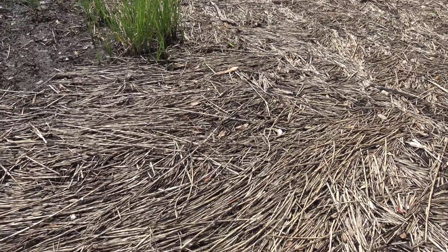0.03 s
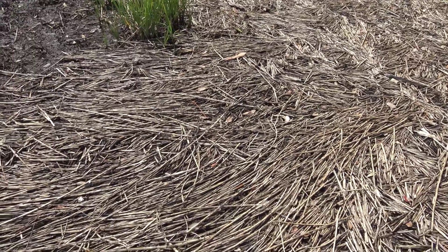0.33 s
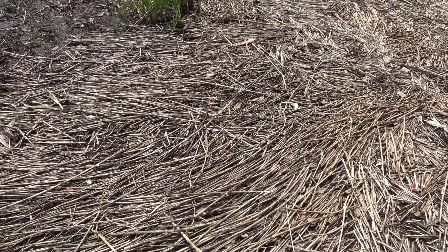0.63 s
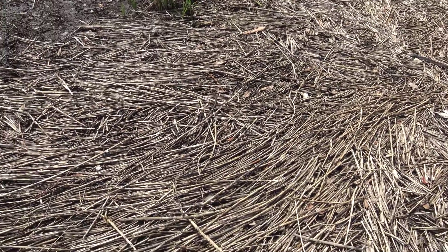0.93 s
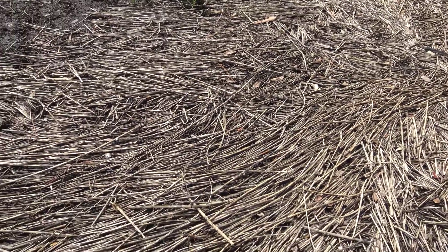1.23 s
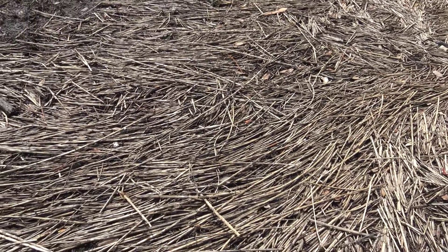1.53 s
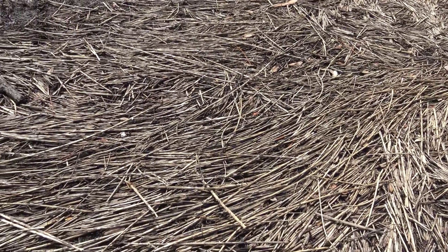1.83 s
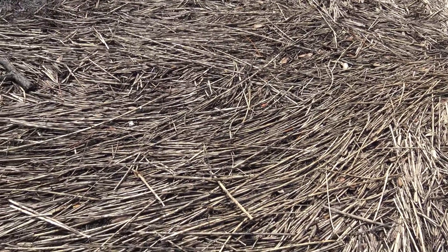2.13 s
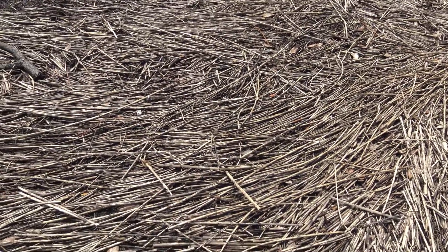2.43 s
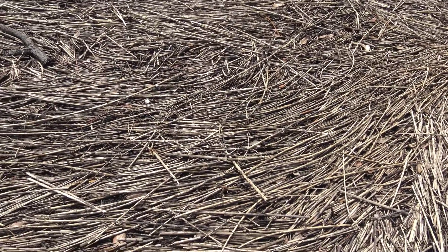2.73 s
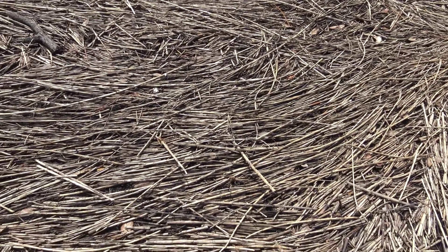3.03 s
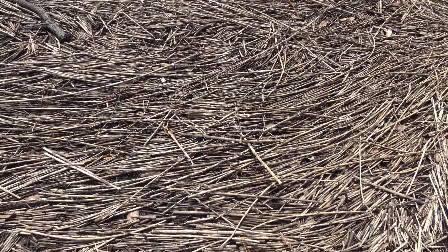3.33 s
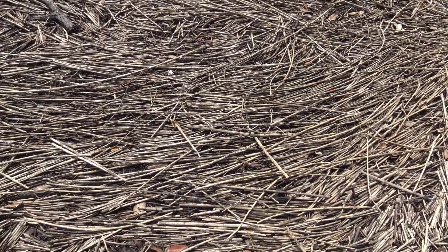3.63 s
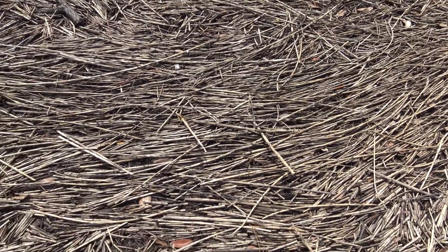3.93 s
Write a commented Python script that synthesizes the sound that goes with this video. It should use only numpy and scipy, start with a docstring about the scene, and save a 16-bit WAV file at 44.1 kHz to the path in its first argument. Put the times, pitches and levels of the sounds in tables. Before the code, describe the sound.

A dense, high ticking rustle of tiny creatures on dry reeds starts faint and swells from about 0.7 seconds, loudest near 3.9. A small bird gives five thin falling chirps, at 0.2, 1.5, 2.6, 3.3 and 3.5 seconds. Stalks tap softly around 0.1, 2.8 and 3.2 seconds, and one snaps at 3.7. Faint outdoor rumble and distant hiss lie underneath throughout.

```python
"""A river bank, the microphone closing in on a mat of dry reeds. From the start, faint rumble and far hiss
lie under the dense ticking of countless small creatures, whose feet set the hollow stalks ringing.
A stalk taps, then a small bird gives the first of five thin falling chirps. From about 0.7 s the
ticking swells as the microphone comes closer, with a few more taps and chirps along the way.
At 3.7 s, just before the ticking is loudest, one stalk snaps."""
import sys
import numpy as np
from scipy import signal
from scipy.fft import rfft, irfft
from scipy.io import wavfile

SR = 44100
rng = np.random.default_rng(int(sys.argv[2]) if len(sys.argv) > 2 else 0)


def file_out(sig):
    """Save sig as 16-bit WAV at sys.argv[1]."""
    # one column per channel
    cols = np.atleast_2d(sig).T
    # limit, then scale
    lim = np.clip(cols, -1, 1)
    pcm = np.round(lim * 32767).astype(np.int16)
    wavfile.write(sys.argv[1], SR, pcm)


N = 176400  # 4 s


def from_db(db):
    """Decibels to gain."""
    return 10 ** (np.asarray(db) / 20)


def unit_rms(x):
    """Scale to rms 1."""
    return x / np.sqrt(np.mean(x ** 2) + 1e-20)


def decay(t, t60):
    """An envelope that falls 60 dB in t60 seconds."""
    return np.exp(-np.log(1000) * t / t60)


def drift(rate_hz):
    """A slow random wander with rms 1."""
    step, settle = 40, 2000
    pole = np.exp(-2 * np.pi * step * rate_hz / SR)
    noise = rng.standard_normal(N // step + settle + 2)
    slow = signal.lfilter([1], [1, -2 * pole, pole * pole], noise)[settle:]
    return np.interp(np.arange(N) / step, np.arange(len(slow)), unit_rms(slow))


def stereo(mid, side, likeness, pan_db):
    """Mix two unrelated signals to left and right; positive pan leans left."""
    likeness = np.clip(likeness, 0, .999)
    mid, side = np.sqrt((1 + likeness) / 2) * mid, np.sqrt((1 - likeness) / 2) * side
    return np.array([(mid + side) * from_db(pan_db / 2), (mid - side) * from_db(-pan_db / 2)])


def footfalls(per_s=4800, spread_db=2):
    """Tiny feet strike at random, most weakly and a few strongly."""
    sizes = from_db(spread_db * np.minimum(rng.exponential(1, N), 4)) * rng.choice([-1, 1], N)
    return sizes * (rng.random(N) < per_s / SR) + 1e-18


# The microphone's approach to the reeds: (time [s], low-ring nearness [dB], high-ring nearness [dB])
APPROACH = [(0, -58, -58), (.68, -56.5, -55), (.99, -49, -49.5), (1.3, -47.5, -48), (1.78, -44, -45),
            (1.96, -43, -41.5), (2.12, -42, -41), (2.3, -39.5, -39.5), (2.8, -38.5, -38.5),
            (3.15, -36.5, -36.5), (3.45, -36, -36), (3.85, -32, -34.5), (4, -34.5, -34.6)]
# Hollow stalks, a little right of the microphone: (frequency [Hz], width [Hz], relative level midway [dB],
# growth [dB per dB of nearness], pan [dB], left-right likeness [0-1])
STALK_RINGS = [(4284, 620, -10.5, 0.48, -3.5, .995), (4810, 550, -4, 0.83, -3, 1),
               (5290, 496, -4, 1.09, -2.5, 0.98), (6070, 1140, -14, .85, -2.5, 1),
               (8940, 1260, -6.5, 0.78, -2.0, 0.93), (9570, 1070, -4, 0.95, -2.4, 0.93),
               (10250, 750, -4.5, 1.25, -2.9, 0.86), (11500, 1800, -13, 0.94, -2.2, .82),
               (14000, 2500, -15, 0.9, -2.3, .78)]

def scurrying(midway_db=-40, split_hz=7500):
    """Footfalls ring the stalks; each ring swells at its own rate as the microphone nears."""
    t, out = np.arange(N) / SR, np.zeros((2, N))
    times, low_db, high_db = np.transpose(APPROACH)
    flurry_db = .19 * drift(rate_hz=6)  # shared by all rings
    for hz, width, db, growth, pan_db, likeness in STALK_RINGS:
        near_db = np.interp(t, times, low_db if hz < split_hz else high_db) - midway_db + flurry_db
        ring = signal.butter(2, [hz - width / 2, hz + width / 2], "band", fs=SR, output="sos")
        mid, side = (unit_rms(signal.sosfilt(ring, footfalls())) for _ in range(2))
        flicker_db = .33 * drift(rate_hz=8.5)
        gain = from_db(midway_db + db + growth * near_db + flicker_db)
        out += gain * stereo(mid, side, likeness, pan_db)
    return out


def reed_mat(direct, scatter_db=-12.5):
    """Sound reaches the microphone directly and as a short dense scatter off the surrounding stalks."""
    t = np.arange(SR // 10) / SR
    tail = rng.standard_normal(len(t)) * decay(t, t60=.077)
    scattered = signal.fftconvolve(direct, tail[None] / np.linalg.norm(tail), axes=1)[:, :N]
    return (direct + from_db(scatter_db) * scattered) / np.hypot(1, from_db(scatter_db))


# Taps in the reeds, centred; the last and strongest is the snap: (time [s], strength [dB])
STALK_TAPS = [(0.1144, -44), (1.1594, -63), (2.8498, -46), (3.2002, -44), (3.7373, -23.5)]
# Modes of a tapped stalk: (frequency [Hz], relative level [dB], t60 [s])
STALK_MODES = [(371, -14.5, 0.05), (504, -13, 0.02), (796, -10, 0.0094), (1210, -7, 0.0096),
               (1770, -9, 0.0074), (2070, -2, 0.0066), (2620, 1.5, 0.0096), (3100, -4.5, 0.0072),
               (4900, 6.5, 0.0045)]

def stalk_taps(splinter_db=-23.5):
    """A click and a brief splintering set the modes of a dry stalk ringing."""
    t, out = np.arange(SR // 10) / SR, np.zeros(N + SR)
    stalk = sum((-1) ** k * from_db(db) * np.sin(2 * np.pi * hz * t) * decay(t, t60)
                for k, (hz, db, t60) in enumerate(STALK_MODES))
    for start, db in STALK_TAPS:
        force = from_db(splinter_db) * rng.standard_normal(len(t)) * decay(t, t60=.036)
        force[0] = 1  # the click
        i = int(start * SR)
        out[i:i + len(t)] += from_db(db) * signal.fftconvolve(force, stalk)[:len(t)] / 2
    return out[:N]


# A small bird, heard centred with its echo off the bank: (time [s], direct level [dB], echo level [dB])
BIRD_CHIRPS = [(.211, -45, -49.5), (1.46, -57, -51), (2.575, -58, -57), (3.267, -53, -56),
               (3.528, -53, -56)]

def bird(length_s=.039, fade_s=.005, top_hz=7980, fall_hz=1410):
    """Each chirp is a sine that falls ever faster, scattered into a short echo by the bank."""
    direct, to_bank = np.zeros((2, N))
    for start, db, echo_db in BIRD_CHIRPS:
        t = np.clip(np.arange(N) / SR - start, 0, length_s)
        hz = top_hz - fall_hz * (t / length_s) ** 1.6
        envelope = np.minimum(1, np.minimum(t, length_s - t) / fade_s)
        chirp = envelope * np.sin(2 * np.pi * np.cumsum(hz) / SR)
        direct += from_db(db) * chirp
        to_bank += from_db(echo_db) * chirp
    t = np.arange(SR // 2) / SR
    tails = rng.standard_normal((2, len(t))) * decay(t, t60=.28)
    mid, side = (signal.fftconvolve(to_bank, tail / np.linalg.norm(tail))[:N] for tail in tails)
    return direct + stereo(mid, side, likeness=.96, pan_db=-1)


def at_hz(points, hz):
    """Read a table on a log-frequency axis."""
    frequencies, values = np.transpose(points)
    return np.interp(np.log(hz + 1e-6), np.log(frequencies), values)


# Open air at the microphone: (frequency [Hz], left-right likeness [0-1])
OPEN_AIR_LIKENESS = [(40, 1), (120, 0.95), (300, 0.84), (750, 0.86), (1150, 0.81), (1600, 1), (6000, 1),
                     (9000, 0.89), (14000, 0.62)]
# The side it leans to: (frequency [Hz], left over right [dB])
OPEN_AIR_PAN = [(35, .3), (90, 1.5), (300, 0), (720, 0.3), (1080, 8), (1450, -1), (2500, 2.5), (4000, -6.5),
                (7000, -1.5), (13000, -.5)]

def air_noise(spectrum):
    """Steady stereo noise of a given colour, falling steeply beyond its ends; mid rms 1."""
    hz = np.arange(N // 2 + 1) * SR / N + 1e-3
    low_hz, high_hz = spectrum[0][0], spectrum[-1][0]
    edges = 1 / np.sqrt((1 + (low_hz / hz) ** 24) * (1 + (hz / high_hz) ** 48))
    mid, side = rfft(rng.standard_normal((2, N))) * from_db(at_hz(spectrum, hz)) * edges
    out = irfft(stereo(mid, side, at_hz(OPEN_AIR_LIKENESS, hz), at_hz(OPEN_AIR_PAN, hz)), N)
    return out / out.mean(axis=0).std()


# The reed bed, far from the microphone: (frequency [Hz], relative density [dB])
HISS_SPECTRUM = [(3350, -16.5), (3700, 1.5), (4050, -11.5), (4450, -3), (4750, -10), (5050, -1.5),
                 (5450, -7.5), (5820, 3), (6150, -6.5), (6450, 0), (6850, -11.5), (7130, -2), (7450, -6.5),
                 (8400, -0.5), (9600, -17), (11500, -15), (15500, -10)]

def reed_hiss():
    """Far reeds blend into one steady high hiss."""
    return from_db(-52.5) * air_noise(HISS_SPECTRUM)


# Outdoor rumble around the bank: (frequency [Hz], relative density [dB])
RUMBLE_SPECTRUM = [(13, -36), (22, -14), (70, 1), (109, -1), (177, -5), (259, -11), (356, -8), (387, -12),
                   (468, -11.5), (777, -17.5), (863, -11), (959, -14.5), (1070, -9), (1180, -19),
                   (2010, -23), (2430, -15), (2700, -21), (3000, -12.5), (3400, -18), (4420, -44),
                   (7480, -120)]

def outdoor_rumble():
    """A faint, steady bed of low noise."""
    return from_db(-56.5) * air_noise(RUMBLE_SPECTRUM)


# Gusts right on the microphone: (time [s], level [dB])
GUST_PEAKS = [(.03, -57.5), (.5, -57), (1.45, -61), (2.95, -58), (3.85, -62)]
# Their low colour: (frequency [Hz], relative density [dB])
GUST_SPECTRUM = [(28, -11), (80, -0.5), (130, -4), (230, -12.5)]

def gusts(width_s=.14):
    """Each soft gust rumbles on the microphone in a bell-shaped swell."""
    t = np.arange(N) / SR
    swells = sum(from_db(db) * np.exp(-((t - peak) / width_s) ** 2) for peak, db in GUST_PEAKS)
    return swells * air_noise(GUST_SPECTRUM)


# A faint drone in the distance: (frequency [Hz], level [dB])
DRONE_PARTIALS = [(118, -65.5), (177, -72), (236, -77.5)]

def distant_drone(waver_rad=.67):
    """Three low tones, each wavering in phase."""
    t = np.arange(N) / SR
    return sum(from_db(db) * np.sqrt(2) * np.sin(2 * np.pi * hz * t + waver_rad * drift(rate_hz=4))
               for hz, db in DRONE_PARTIALS)


def scene():
    """The bank as the microphone hears it: creatures, bird and stalks over the background."""
    foreground = reed_mat(scurrying()) + bird() + stalk_taps()
    return foreground + distant_drone() + gusts() + outdoor_rumble() + reed_hiss()


def record(dry, cutoff_hz=15750):
    """The top of the treble is cut steeply."""
    return signal.sosfilt(signal.ellip(12, .1, 80, cutoff_hz, fs=SR, output="sos"), dry)


dry = scene()
out = record(dry)
file_out(out)
```